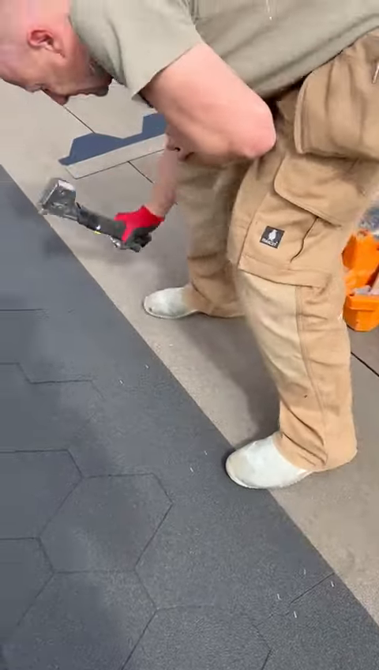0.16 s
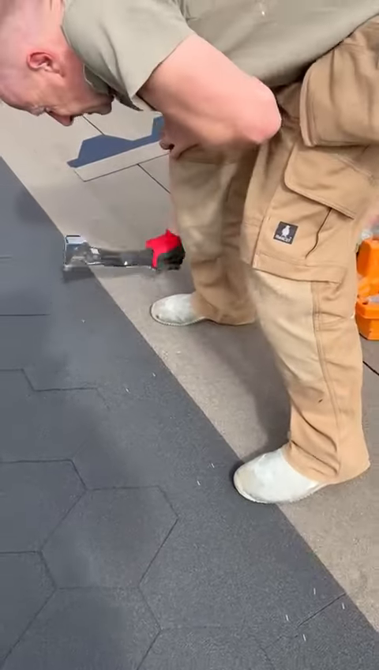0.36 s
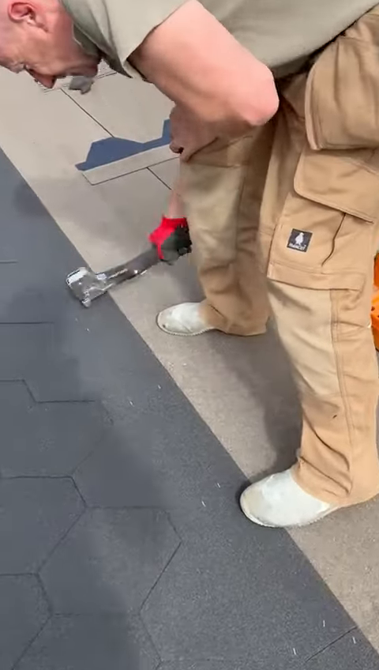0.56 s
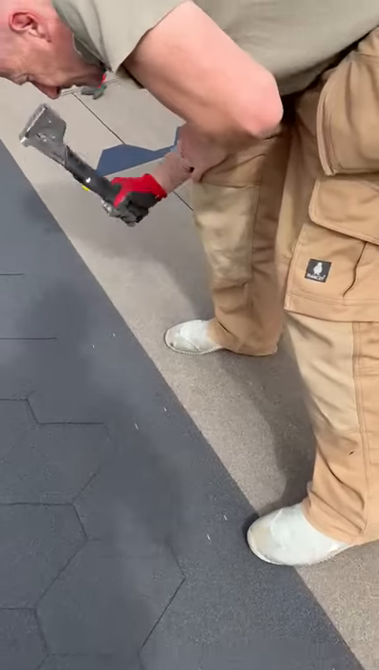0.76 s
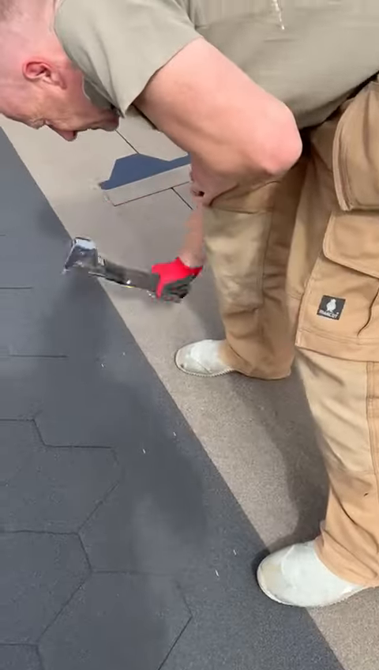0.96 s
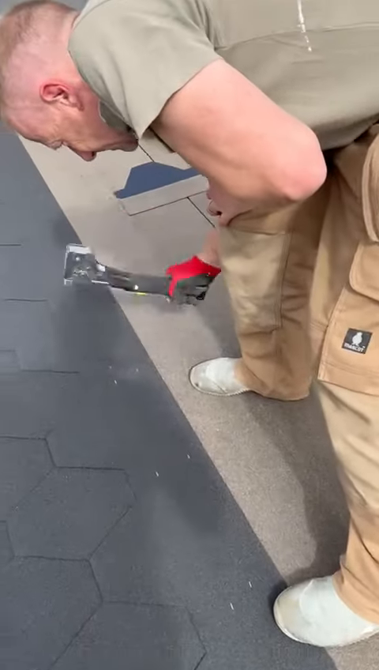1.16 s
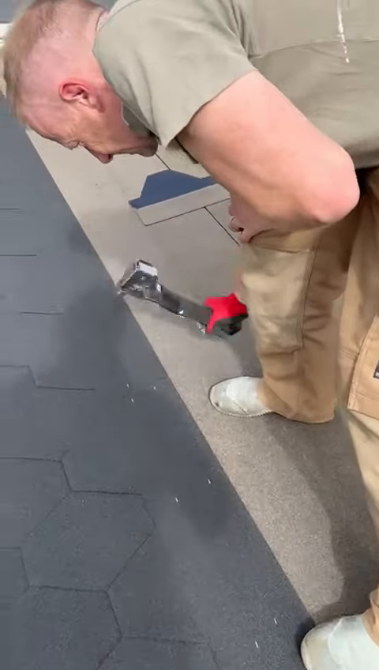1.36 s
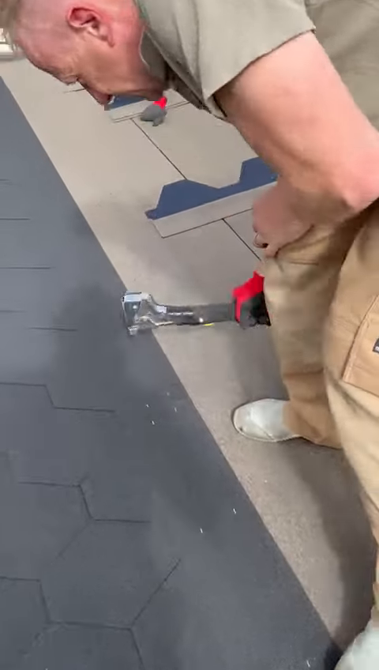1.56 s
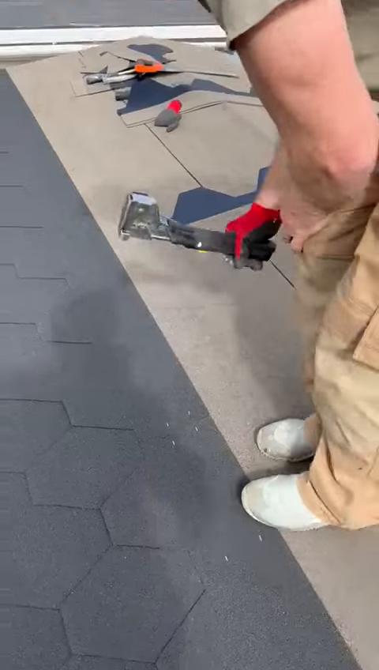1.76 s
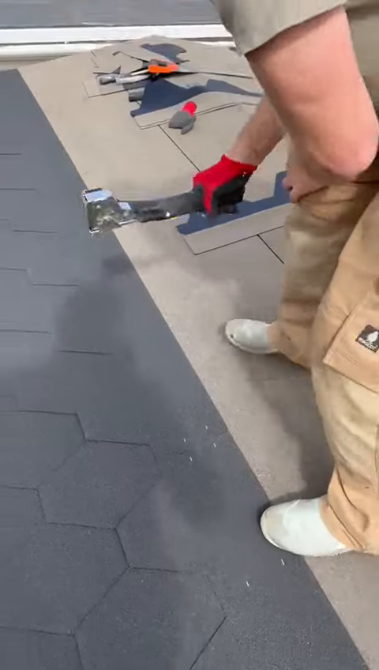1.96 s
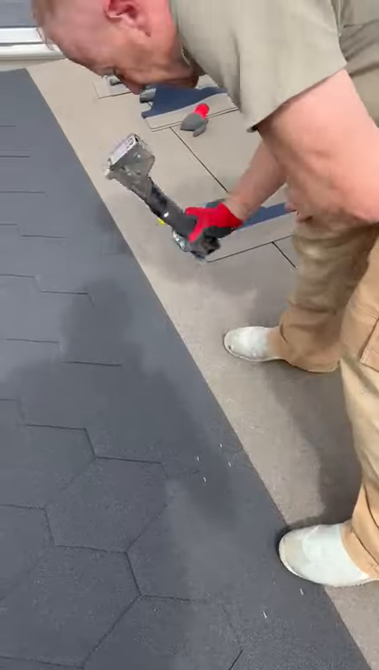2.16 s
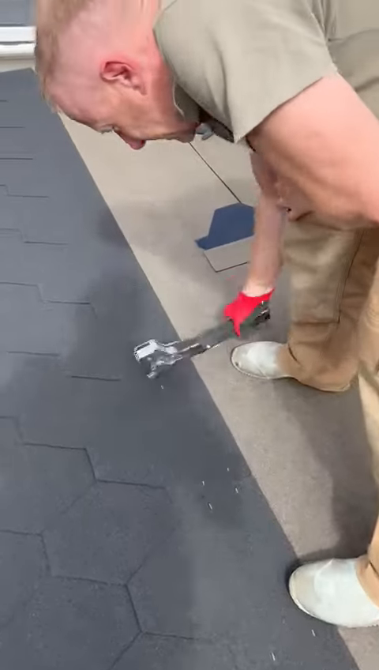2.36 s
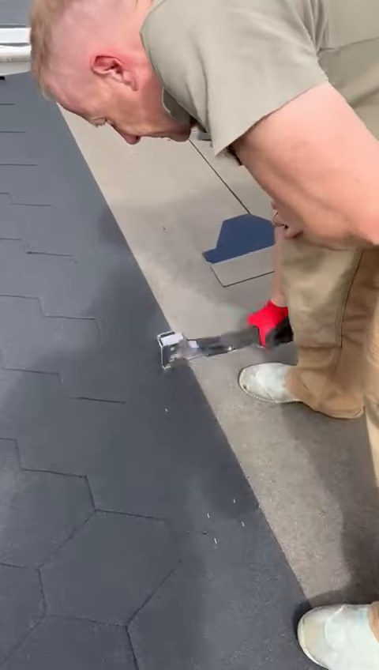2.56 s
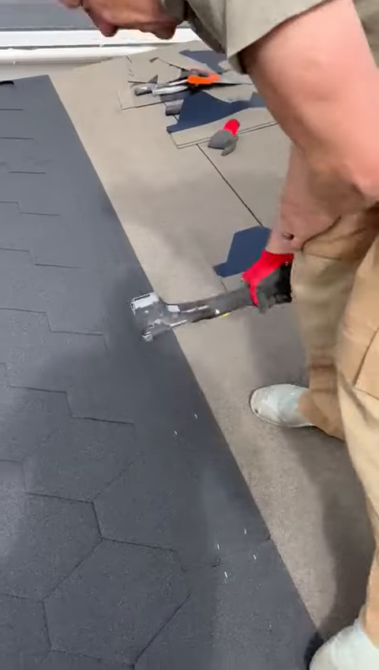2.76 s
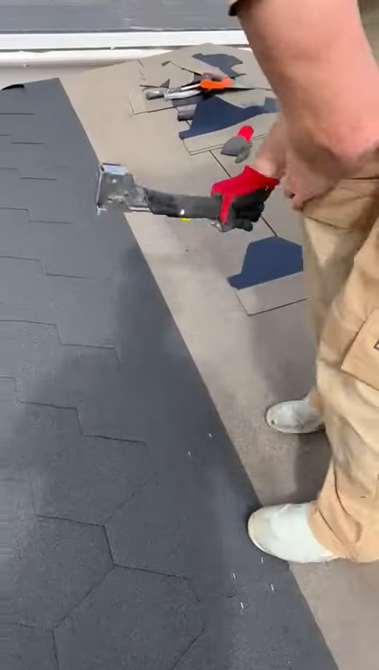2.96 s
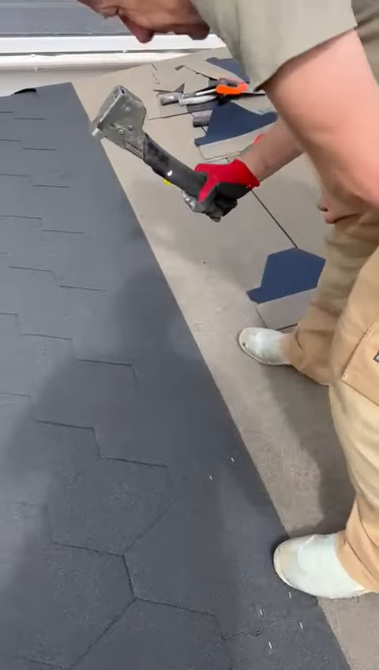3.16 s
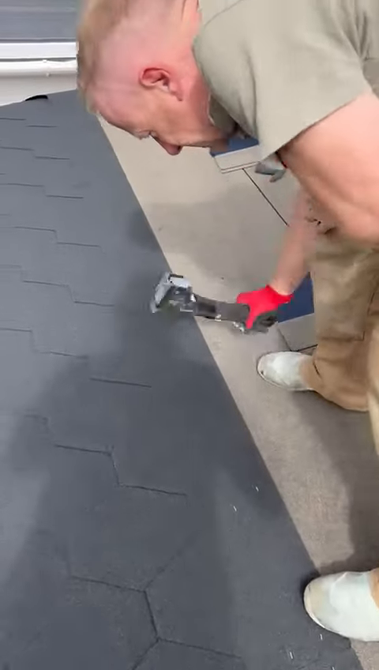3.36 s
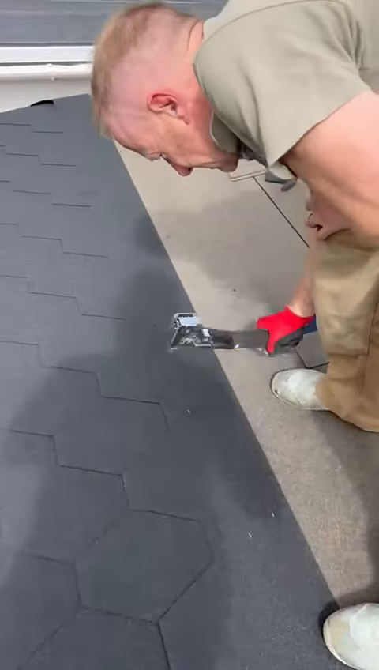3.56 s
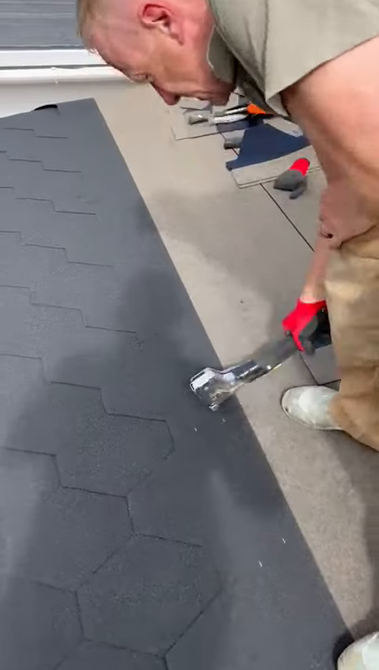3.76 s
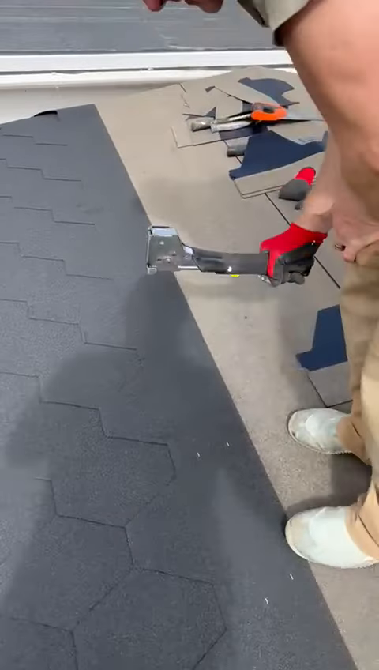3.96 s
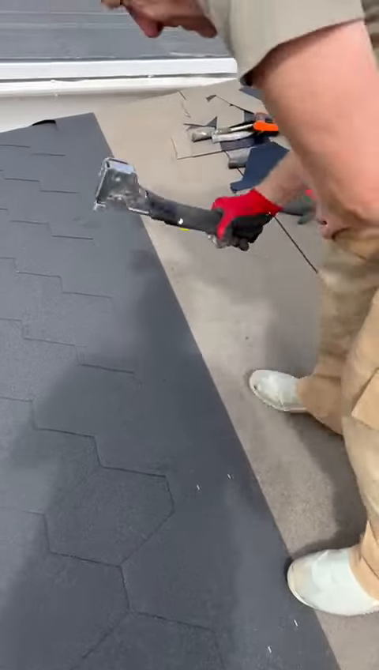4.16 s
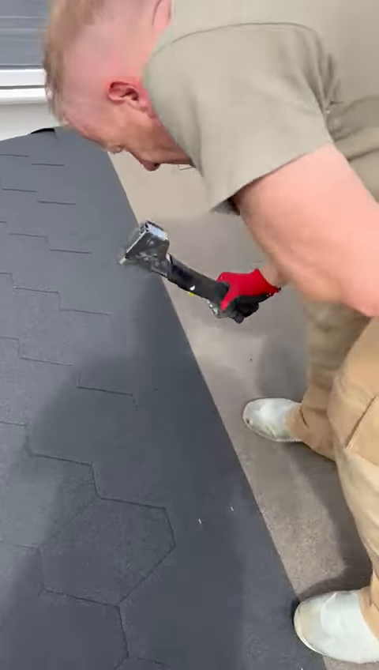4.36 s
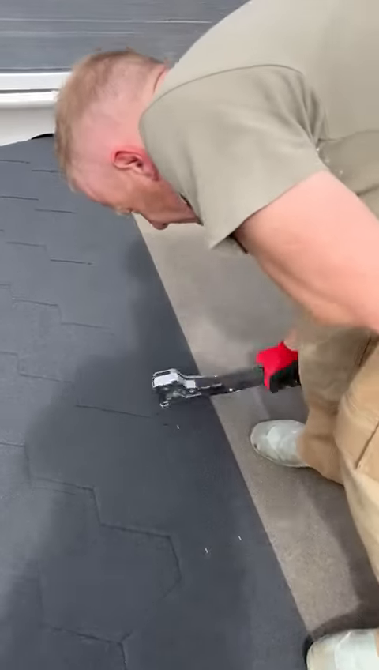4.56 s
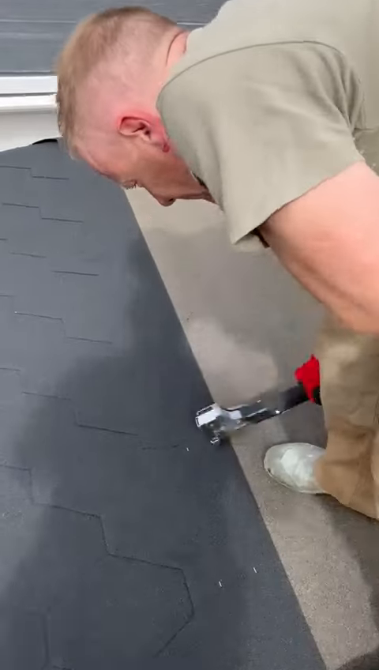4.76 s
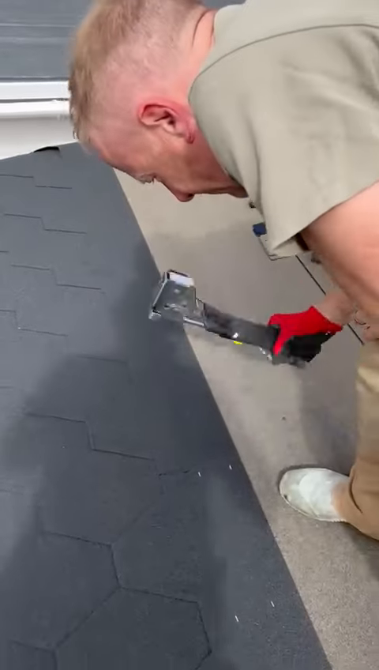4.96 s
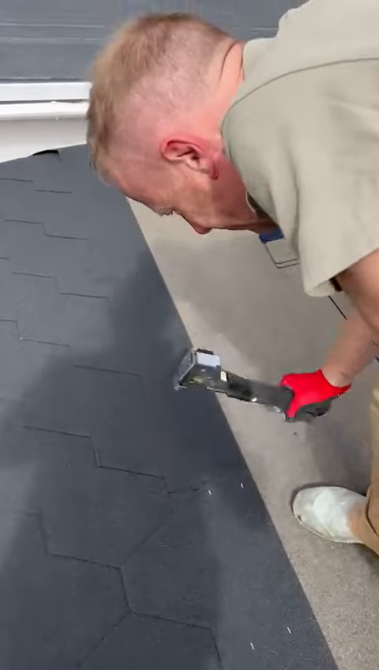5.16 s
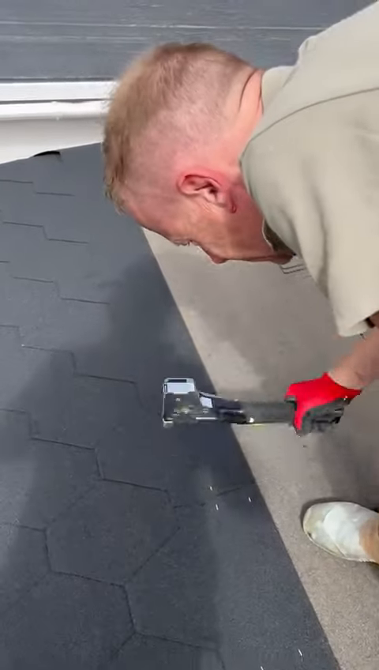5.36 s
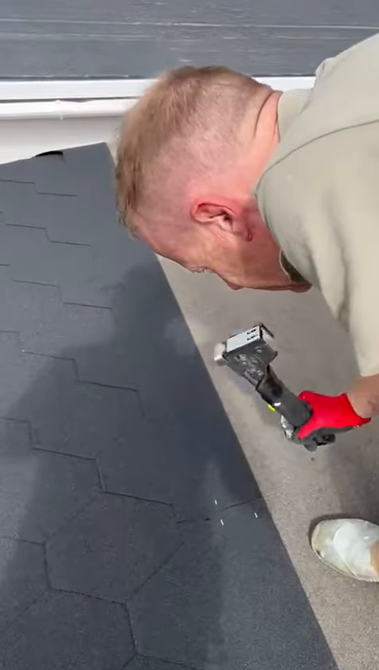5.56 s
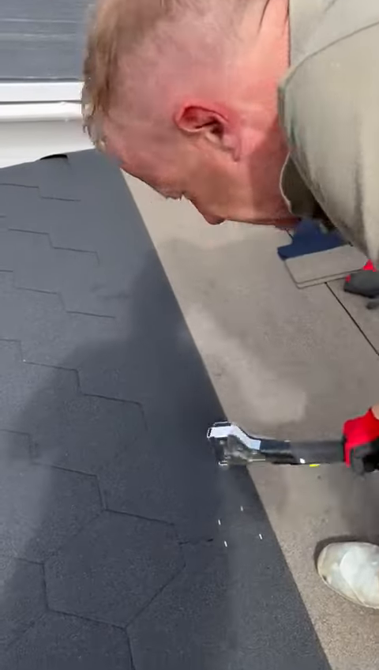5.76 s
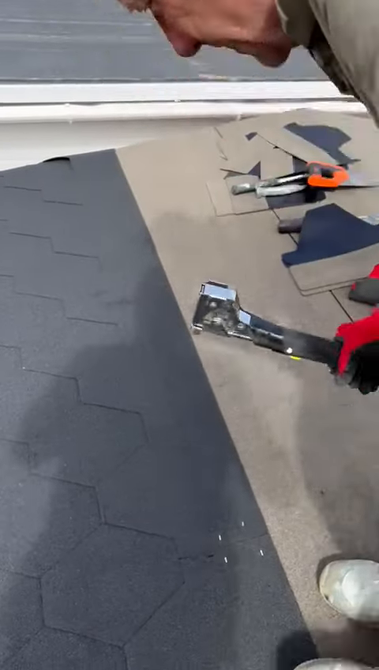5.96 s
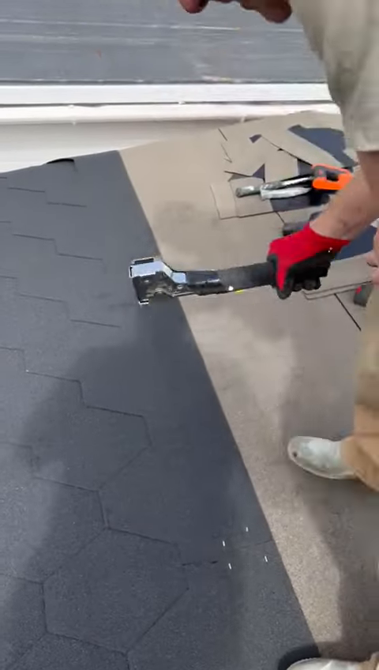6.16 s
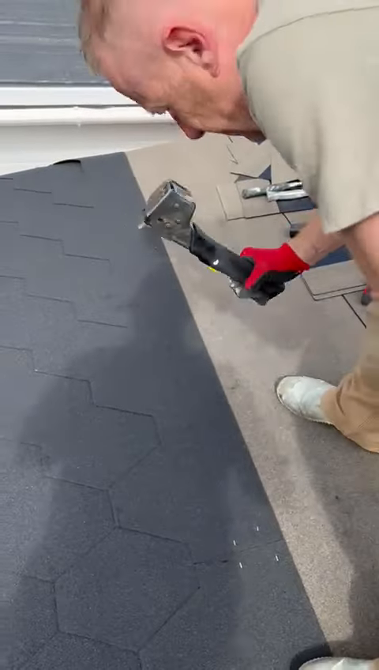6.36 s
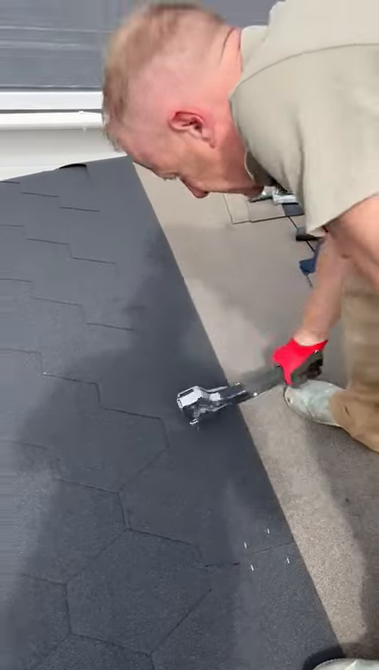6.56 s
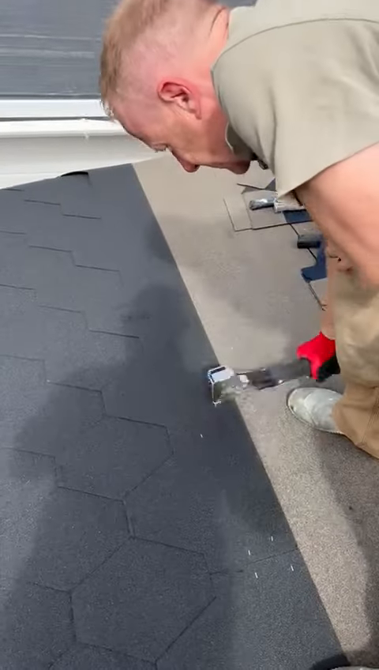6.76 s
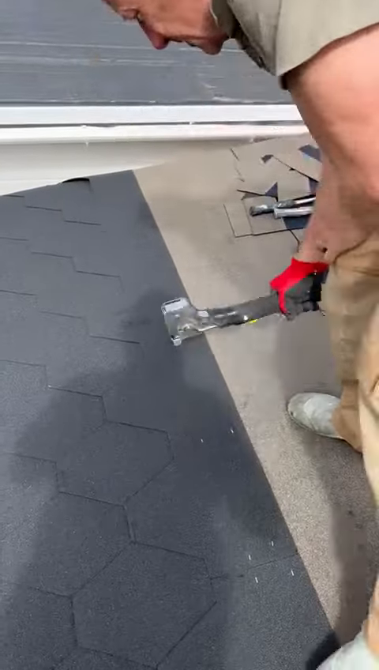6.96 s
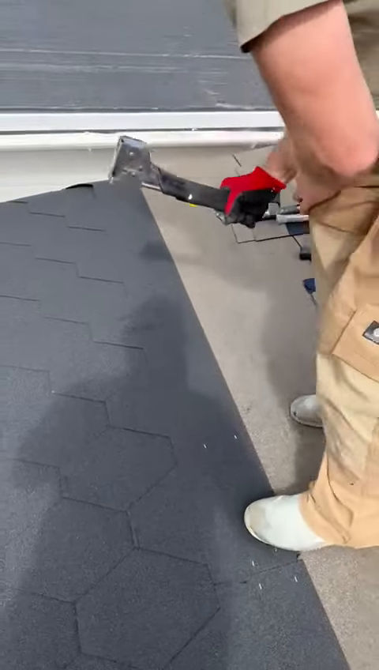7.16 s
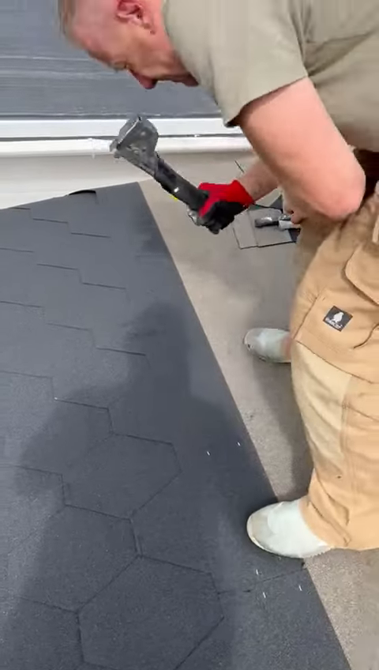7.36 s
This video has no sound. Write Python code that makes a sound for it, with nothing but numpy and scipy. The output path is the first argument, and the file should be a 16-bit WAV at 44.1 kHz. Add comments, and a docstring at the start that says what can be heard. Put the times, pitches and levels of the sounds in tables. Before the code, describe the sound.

Close, sharp stapling whacks on a wooden roof deck, usually two at a time, with light tool rattles, soft footsteps and quiet open air between.

```python
"""First a soft footfall in quiet open air, then a pair of hard blows: a roofer at work with a hammer tacker.
Close to the two microphones, fourteen blows, mostly in pairs, each crack twice (nose lands, staple seats),
send a falling bending wave through the wooden deck and end in the clack of the driver springing back.
Between them the tool rattles, cloth brushes and soles grind grit. Further off, nearby walls echo.
Contacts are enveloped noise and sines; echoes, rumble and air are noise arriving from all round."""
import sys
import numpy as np
from scipy import signal
from scipy.fft import rfft, irfft
from scipy.io import wavfile

SR = 44100
rng = np.random.default_rng(int(sys.argv[2]) if len(sys.argv) > 2 else 0)


def output_pcm(signal):
    """Save a mono or channel-first signal as 16-bit PCM at the path in sys.argv[1].

    Samples are clipped to [-1, 1] before scaling.
    """
    pcm = np.clip(np.atleast_2d(signal).T, -1, 1) * 32767
    wavfile.write(sys.argv[1], SR, np.round(pcm).astype(np.int16))


N = 327222
AGE = np.arange(SR) / SR   # time since a contact, s


# Blows, levels relative: t/s, crack level/dB, steel snap level/dB, knock f/Hz, knock level/dB,
# bending wave starting f/Hz, give of the deck at that spot level/dB
BLOWS = [ (0.3363, 0.5, 8.5, 800, -11, 460, -5.5), (0.562, 4, 2.5, 1084, -6, 428, -20),
         (1.1025, 2, 9, 900, -4.5, 523.4, -0.5), (1.5122, 5, 8, 809, -3.5, 524, -1.5),
         (2.4135, 1, 10, 1250, -12.5, 502, 4.5), (2.6805, 1, 5.5, 770, -6.5, 442, 1),
         (3.5077, 0.5, 10, 888, -8.5, 510, 1.5), (3.7603, 2.5, 3.5, 720, -5, 456, -2),
         (4.5760, 4, 6, 1258, -6, 556, 2.5), (4.8226, 4, 1.5, 873, -8, 474, -4.5),
         (5.3065, -1, 4, 1307, -10.5, 670, -2), (5.7508, 2.5, 2.5, 1300, -9.5, 627, 2.5),
         (6.6297, 2.5, 7, 677, -9, 593, 3), (6.877, -1.5, 6, 700, -9, 562, -0.5)]
# Noise colour of the crack under the nose: f/Hz, relative level/dB per Hz
CRACK_COLOUR = [(100, -28), (300, -10.5), (550, -9.5), (750, 2.5), (1250, 7.5), (1550, -1), (1850, -0.5),
                (2400, -8), (3050, -7.5), (4200, -18), (7000, -18.5), (12000, -24)]
# Noise colour of the driver shearing a staple off: f/Hz, relative level/dB per Hz
SNAP_COLOUR = [(1500, -20), (3500, 1), (5500, -2.5), (7000, -5.5), (9000, -0.5), (11000, -1), (12000, -5.5)]
# Noise colour of the driver's return and the rattling staples: f/Hz, relative level/dB per Hz
CLACK_COLOUR = [(300, -4), (900, 2), (2000, -2), (4500, -0.5), (5200, -6), (7000, 0.5), (8700, 2),
                (10000, -3.5), (11200, 1.5), (12000, -5)]
NOSE_LEAD_S = .0002   # the nose touches the shingle just before the blow's time
RING_FOLLOWS, CLACK_FOLLOWS = 0.42, 0.66   # shares of the steel snap's dB kept by ring and return clack


def tacker(nose_db=-13, seat_db=-15, snap_db=-23, seat_s=.0025, return_db=-27.5, return_s=.0172,
           chatter_db=-32, ring_db=-2, return_ring_db=-7.0, return_chatter_db=-38.0):
    """The nose lands, the staple seats, and as the head bounces off the driver snaps back."""
    out = np.zeros(N)
    for s, crack_db, steel_db, knock_hz, knock_db, _, _ in BLOWS:
        nose = from_db(nose_db + crack_db) * noise(CRACK_COLOUR) * fade(0.028, rise=0.0001)
        # the board right under the nose
        knock = from_db(knock_db) * sine(knock_hz) * fade(0.019, rise=0.0001)
        # the driver shears a staple off the strip
        snap = from_db(snap_db + steel_db) * noise(SNAP_COLOUR) * swell(0.0016, 0.84)
        add(out, s - NOSE_LEAD_S, nose + knock + snap)

        seat = from_db(seat_db) * noise(CRACK_COLOUR) * fade(0.014)
        seat += from_db(chatter_db) * chatter(0.027)
        ring = from_db(ring_db + RING_FOLLOWS * steel_db) * steel_ring()
        add(out, s + seat_s, from_db(crack_db) * seat + ring)

        clack = from_db(return_db) * noise(CLACK_COLOUR) * swell(.0015, 0.59)
        clack += from_db(return_ring_db) * steel_ring()
        clack += from_db(return_chatter_db) * chatter(.095) * grain(1.7)
        add(out, s + return_s, from_db(CLACK_FOLLOWS * steel_db) * clack)
    return out


def chatter(t60, per_s=900):
    """The strip of staples shakes in its magazine: a dying shower of tiny ticks."""
    ticks = 1.0 * (rng.random(SR) < per_s / SR)
    tick_decay = np.exp(-1 / (0.00085 * SR))
    grains = signal.lfilter([1], [1, -tick_decay], ticks + 1e-18)
    return noise(CLACK_COLOUR) * (1.1 + grains) * fade(t60)


# Modes of the tool's steel body, before their random shifts: f/Hz, relative level/dB, decay t60/s
STEEL_MODES = [(1260, -35, .04), (1830, -36, .06), (2860, -41, .06), (3060, -30, .055), (3990, -47, .09),
               (4460, -44, .14), (4680, -47, .08), (5600, -46, .08), (8150, -44, .1), (8390, -45, .08),
               (9400, -45, .06), (11260, -44, .11)]
STEEL_SPREAD = .005   # standard deviation of a mode's pitch, as a share of it


def steel_ring():
    """Each contact rings the body's modes with strengths, signs and small pitch shifts of its own."""
    strength, shift = rng.standard_normal((2, len(STEEL_MODES)))
    signs = rng.choice([-1, 1], len(STEEL_MODES))
    ring = np.zeros(SR)
    for (hz, db, t60), own, off, sign in zip(STEEL_MODES, strength, shift, signs):
        vibration = sine(hz * (1 + STEEL_SPREAD * off))
        ring += sign * from_db(db + 2 * own) * vibration * fade(t60)
    return ring


# Slow modes of the roof frame: f/Hz, relative level/dB, decay t60/s
FRAME_MODES = [(81, -35, .6), (101, -39, .55), (137, -22, .12), (197, -21, .11), (235, -42, .5),
               (265, -44, .5), (315, -43, .5)]
WAVE_LAG_S = .0007   # the bending wave builds up just after the crack
SWING_HZ, SWING_DB = 77, -10   # the sheet swinging on its rafters; the deck's give is added to the dB
SWING_AFTER_CYCLES = 11.5   # delay of the swing, in periods of the bending wave's starting pitch


def deck(wave_db=-0.34, frame_db=1.2):
    """After the bending wave the whole sheet swings on its rafters, more where it gives; the frame rings."""
    out = np.zeros(N)
    for s, *_, wave_hz, give_db in BLOWS:
        add(out, s + WAVE_LAG_S, from_db(wave_db) * bending_wave(wave_hz))
        swing = from_db(SWING_DB + give_db) * sine(SWING_HZ) * swell(0.0063, 2.0)
        add(out, s + SWING_AFTER_CYCLES / wave_hz, swing)
        for hz, db, t60 in FRAME_MODES:
            spot_db = rng.normal(0, 1.5)   # each blow excites each mode a little differently
            mode = from_db(frame_db + db + spot_db) * sine(hz) * fade(t60, rise=.001)
            add(out, s + 0.016, mode)
    return out


def bending_wave(start_hz, all_cycles=8.6, front_db=-5.5, front_s=0.0038, slow_db=-13, slow_s=.012):
    """High bending waves run fastest through the boards, so the pitch falls, in the end as 1 / time squared."""
    cycles = start_hz * AGE / (1 + start_hz * AGE / all_cycles)
    front = from_db(front_db) * swell(front_s, 1.6)
    slow = from_db(slow_db) * swell(slow_s, 2.1)
    return np.sin(2 * np.pi * cycles) * (front + slow)


# Loose parts clicking as the roofer shifts the tool: t/s, relative level/dB
RATTLES = [(1.931, -30.5), (2.9776, -27), (3.055, -32), (3.302, -40), (4.0138, -24), (4.0967, -30.5),
           (5.1165, -37), (6.054, -29.5), (6.1695, -28), (6.2412, -32), (6.4433, -33.5), (6.559, -30)]
# Noise colour of those clicks: f/Hz, relative level/dB per Hz
RATTLE_COLOUR = [(300, -19.5), (800, -5.5), (1600, 1.5), (3200, -4), (5500, -6.5), (9000, -4.5),
                 (12000, -22.5)]
# Trousers brushing: t/s at the middle of the stroke, relative level/dB
SCUFFS = [(1.38, -44.5), (1.823, -47), (2.09, -53.5), (2.235, -45.5), (2.990, -43), (3.078, -47.5),
          (3.14, -50.5), (4.03, -45), (4.145, -49), (7.187, -43), (7.271, -44)]
# Noise colour of cloth and grit: f/Hz, relative level/dB per Hz
SCUFF_COLOUR = [(150, 6), (500, -1), (900, 0), (1600, -3.5), (2800, -11), (5500, -12), (9000, -11),
                (12000, -21.5)]
# Footfalls on the deck: t/s, thump level/dB, grit level/dB, trouser leg level/dB, all relative
STEPS = [(.026, -39, -53, -58), (2.120, -36, -72, -61), (3.232, -36.5, -66, -47.5),
         (4.283, -35.5, -47, -48.5), (6.367, -26.5, -35.5, -62)]
# two blows closer than the gap make a pair; the tool rattles at this share of the way between them
PAIR_GAP_S, LIFT_SHARE, LIFT_DB = .3, .53, -30
FIDGETS_PER_S, FIDGET_DB = 2, -43.5   # faint clicks at random moments
SLEEVE_LAG_S, SLEEVE_DB = 0.0048, -27   # sleeve after each listed rattle; dB added to the rattle's entry
STRIDE_LAG_S = .025   # the trouser leg brushes just after the foot lands
HALF_SCUFF_S = 0.067   # half the length of one brush of cloth


def handling(rattle_db=-14, ring_db=6, scuff_db=-4):
    """Loose parts click when the tool is jerked; sleeve and trousers brush as bursts of uneven noise."""
    out = np.zeros(N)
    times = [s for s, *_ in BLOWS]
    lifts = [(s + LIFT_SHARE * gap, LIFT_DB)
             for s, gap in zip(times, np.diff(times)) if gap < PAIR_GAP_S]
    fidgets = [(s, FIDGET_DB) for s in rng.uniform(0, N / SR, round(FIDGETS_PER_S * N / SR))]
    for s, db in [*RATTLES, *lifts, *fidgets]:
        shake = fade(.06, rise=.0012) * grain(4, size=90)
        click = noise(RATTLE_COLOUR) * shake + from_db(ring_db) * steel_ring()
        add(out, s, from_db(db + rattle_db) * click)

    sleeves = [(s + SLEEVE_LAG_S, db + SLEEVE_DB) for s, db in RATTLES]
    strides = [(s + STRIDE_LAG_S, leg_db) for s, *_, leg_db in STEPS]
    stroke = np.sin(np.pi * np.minimum(AGE / (2 * HALF_SCUFF_S), 1)) ** 4
    for s, db in [*SCUFFS, *sleeves, *strides]:
        brush = noise(SCUFF_COLOUR) * stroke * grain(4.8, size=130)
        add(out, s - HALF_SCUFF_S, from_db(db + scuff_db) * brush)
    return out


def steps(swing_hz=62, swing_peak_s=0.014):
    """A soft sole sets the deck swinging and grinds a little grit."""
    out = np.zeros(N)
    for s, db, grit_db, _ in STEPS:
        add(out, s, from_db(db) * sine(swing_hz) * swell(swing_peak_s, 0.76))
        grit = from_db(grit_db) * noise(SCUFF_COLOUR) * fade(.035, rise=.0005)
        add(out, s + .0105, grit)
    return out


# Phase by which the left microphone leads for close sounds: f/Hz, phase/rad
PORT_PHASE = [(300, 0), (2800, 0.14), (4700, -1.1), (5900, -.95), (8000, -1.4), (12000, -1.35)]


def at_microphones(close):
    """Close sounds reach the two microphones with a small phase difference in the treble."""
    lead = at_hz(PORT_PHASE, np.fft.rfftfreq(N, 1 / SR))
    left_right = np.array([[1], [-1]])
    return irfft(rfft(close) * np.exp(.5j * lead * left_right), N)


# Noise colour of the roof's rumble: f/Hz, relative level/dB per Hz
RUMBLE_COLOUR = [(25, -19), (50, 5), (80, 7.5), (115, -3), (170, -5), (330, -4.5), (430, -10.5),
                 (540, -21.5), (1100, -32), (4000, -56.5)]
TAIL_FOLLOWS = 0.24   # share of the deck's give, in dB, that rumble and echoes keep


def afterglow(level_db=-27.0, shudder_db=-29):
    """The roof shudders under each blow, alike at both microphones, and rumbles on from all round."""
    out = np.zeros((2, N))
    envelope = lingering(1.17, 0.23, 0.42)
    for s, *_, give_db in BLOWS:
        add(out, s, from_db(level_db + TAIL_FOLLOWS * give_db) * diffuse(RUMBLE_COLOUR) * envelope)
        add(out, s + 0.0067, from_db(shudder_db) * noise(RUMBLE_COLOUR) * swell(.016, 1.7))
    return out


# Near walls: delay t/s, level/dB over the scattered sound
WALLS = [(.0708, 12), (.136, -4), (.158, 2), (.298, 1)]
# Noise colour of the reflections: f/Hz, relative level/dB per Hz
REFLECTED_COLOUR = [(250, -11), (550, 1.5), (1100, 0.5), (1600, -3.5), (2900, -4.5), (4500, -12),
                    (7000, -12), (9000, -17), (11500, -19)]


def wall_echoes(level_db=-47.0, slap_t60=0.026, second_share=.4):
    """The houses around scatter each double crack back, with a slap from each near wall."""
    paths = np.ones(SR)
    for delay, db in WALLS:
        add(paths, delay, from_db(db) * fade(slap_t60))
    envelope = lingering(1.0, 0.19, 0.89) * paths
    out = np.zeros((2, N))
    for s, *_, give_db in BLOWS:
        uneven = grain(2.5, size=300)
        level = from_db(level_db + TAIL_FOLLOWS * give_db)
        echo = level * diffuse(REFLECTED_COLOUR) * envelope * uneven
        add(out, s - NOSE_LEAD_S, echo)   # the nose landing
        add(out, s + 0.0027, second_share * echo)   # the staple seating
    return out


# Noise colour of the outdoor air: f/Hz, relative level/dB per Hz
AIR_COLOUR = [(22, -1.5), (50, -1.5), (90, -2), (170, -6), (280, -14), (420, -21), (700, -31.5),
              (1500, -30.5), (3300, -34.5), (6000, -41), (12000, -50.5)]
# Level of the outdoor air: t/s, level/dB
AIR_LEVEL = [(0, -55.5), (1, -56), (2.2, -54.5), (7.4, -50.5)]


def outdoor_air():
    """Quiet open air at the microphones: coloured noise from all round at a slowly changing level."""
    level_db = np.interp(np.arange(N) / SR, *np.transpose(AIR_LEVEL))
    return from_db(level_db) * diffuse(AIR_COLOUR, size=N)


# Likeness of left and right for sound from all round: f/Hz, likeness/0-1
LIKENESS = [(100, .999), (300, .97), (640, .8), (2000, .65), (4000, .45), (12000, .33)]


def diffuse(spectrum, size=SR):
    """Stereo noise from all round: alike in the bass, less so in the treble."""
    alike = np.clip(at_hz(LIKENESS, np.fft.rfftfreq(size, 1 / SR)), 0, 1)
    mid = rfft(noise(spectrum, size=size)) * np.sqrt((1 + alike) / 2)
    side = rfft(noise(spectrum, size=size)) * np.sqrt((1 - alike) / 2)
    return irfft(np.array([mid + side, mid - side]), size)


def noise(spectrum, size=SR):
    """Noise of a given colour, rms 1."""
    gain = from_db(at_hz(spectrum, np.fft.rfftfreq(size, 1 / SR)))
    x = irfft(rfft(rng.standard_normal(size)) * gain, size)
    return x / x.std()


def sine(hz):
    """A vibration starting from rest."""
    return np.sin(2 * np.pi * hz * AGE)


def fade(t60, rise=1e-4):
    """Envelope of a contact: a quick rise, then exponential decay by 60 dB in t60 seconds."""
    return (1 - np.exp(-AGE / rise)) * np.exp(-np.log(1000) * AGE / t60)


def swell(peak_s, steep):
    """Envelope that grows to 1 at peak_s and dies away."""
    return (AGE / peak_s * np.exp(1 - AGE / peak_s)) ** steep


def lingering(early_t60, hold_s, late_t60):
    """A tail that holds up at first and then, from hold_s on, falls away faster."""
    late_db = -60 * (hold_s / early_t60 + (AGE - hold_s) / late_t60)
    return np.minimum(fade(early_t60, rise=0.002), from_db(late_db))


def grain(depth_db, size=220):
    """An uneven gain, rms 1, gliding to a new random value every `size` samples."""
    count = SR // size + 2
    wander = np.interp(np.arange(SR) / size, np.arange(count), rng.standard_normal(count))
    gain = from_db(depth_db * wander)
    return gain / np.sqrt(np.mean(gain ** 2))


def from_db(db):
    """Decibels to gain."""
    return 10 ** (np.asarray(db) / 20)


def at_hz(points, hz):
    """Read a table on a log-frequency axis."""
    known_hz, values = np.transpose(points)
    return np.interp(np.log(hz + 1e-3), np.log(known_hz), values)


def add(track, s, sound):
    """Mix a sound into a track at time s."""
    start = max(round(s * SR), 0)
    part = sound[..., :track.shape[-1] - start]
    track[..., start:start + part.shape[-1]] += part


def scene():
    """Tool, deck and roofer close by; rumble, echoes and quiet outdoor air behind."""
    close = tacker() + deck() + handling() + steps()
    return at_microphones(close) + afterglow() + wall_echoes() + outdoor_air()


def record(dry, low_cut_hz=24, top_cut_hz=11800):
    """The deepest bass is cut, the highest peaks are rounded and the top is cut."""
    low_cut = signal.butter(2, low_cut_hz, "high", fs=SR, output="sos")
    lean = signal.sosfilt(low_cut, dry)
    rounded = lean / (1 + np.abs(lean) ** 6) ** (1 / 6)
    top_cut = signal.ellip(10, .3, 75, top_cut_hz, fs=SR, output="sos")
    return signal.sosfilt(top_cut, rounded)


dry = scene()
out = record(dry)
output_pcm(out)
```